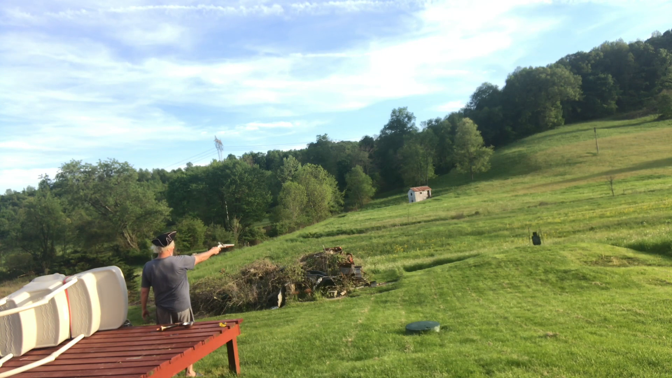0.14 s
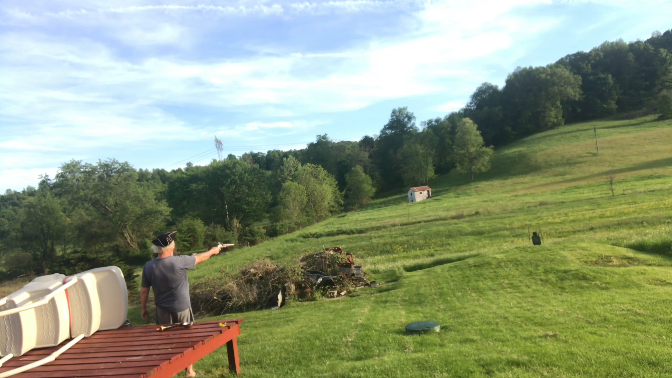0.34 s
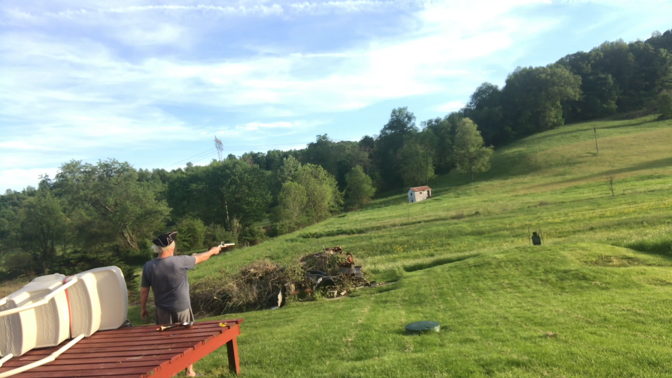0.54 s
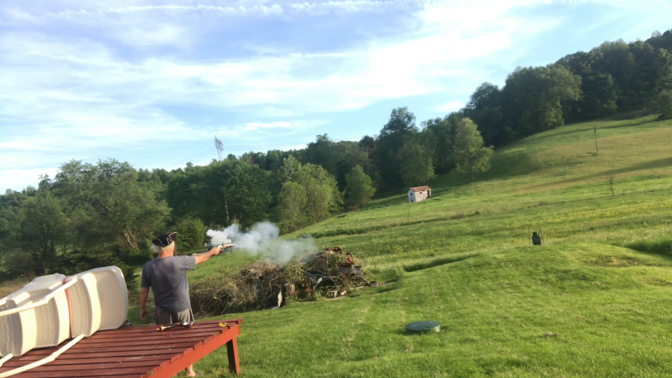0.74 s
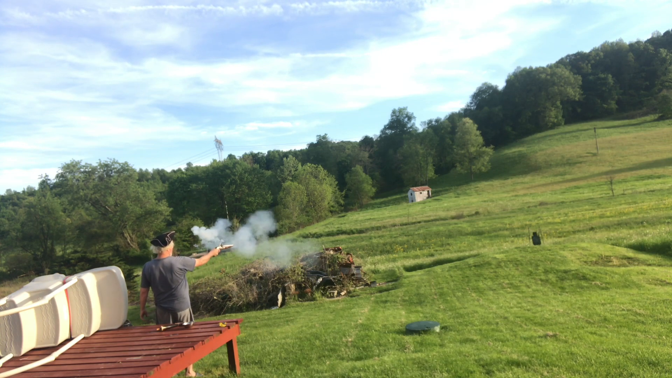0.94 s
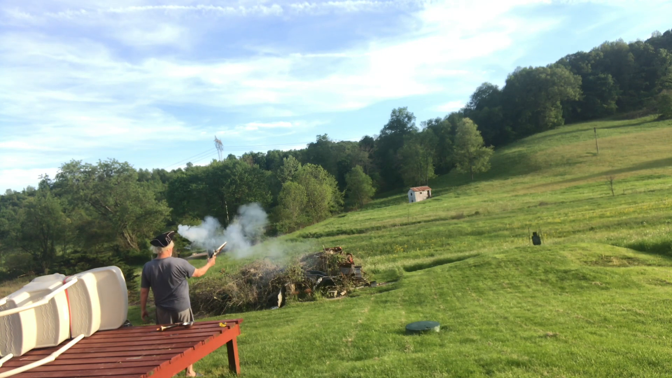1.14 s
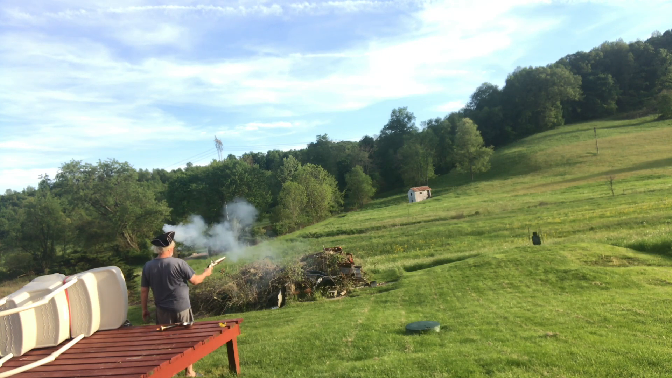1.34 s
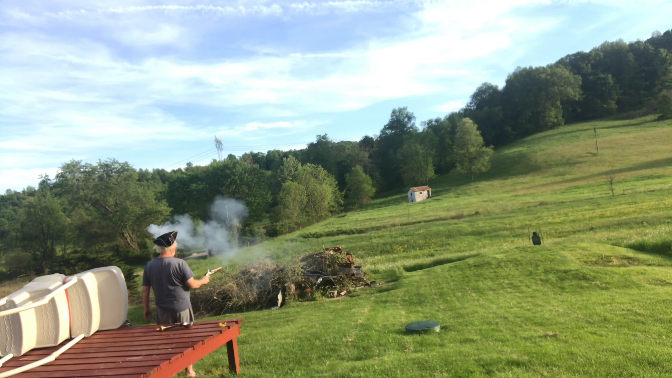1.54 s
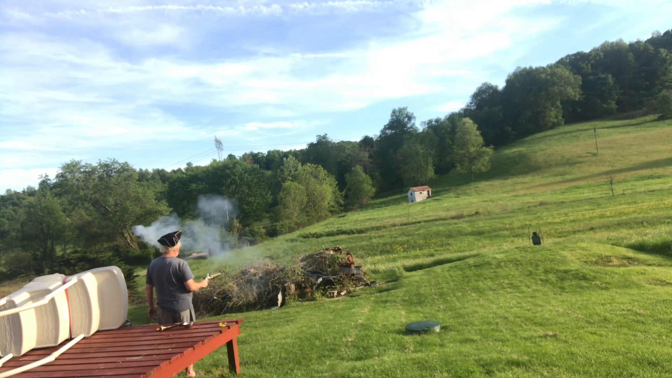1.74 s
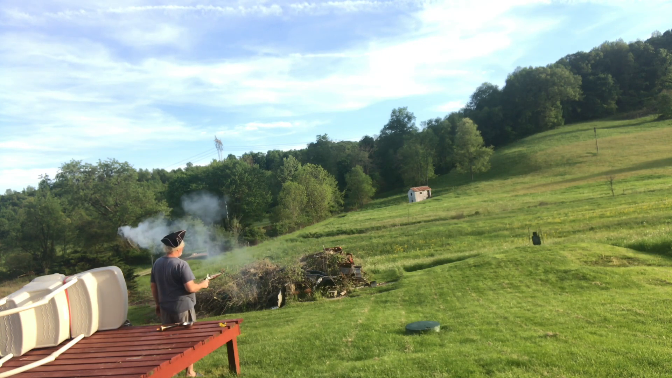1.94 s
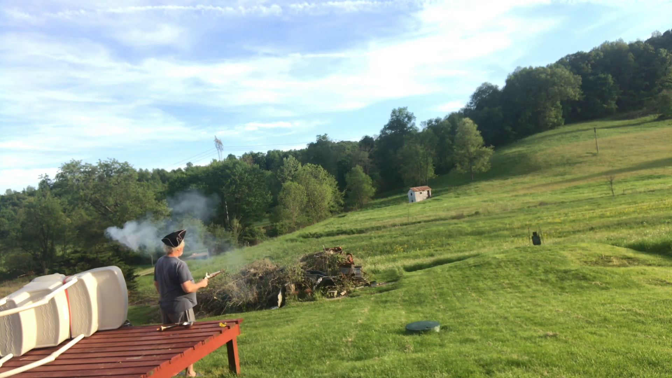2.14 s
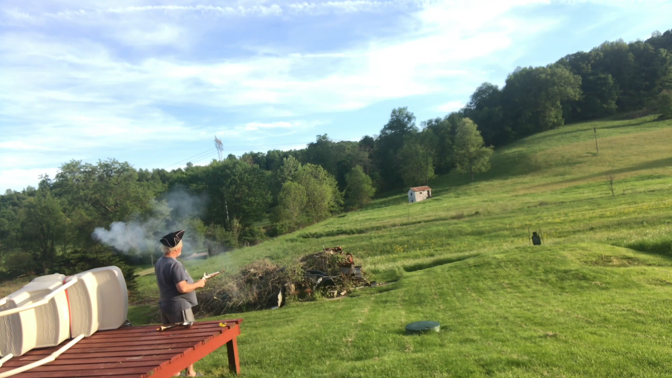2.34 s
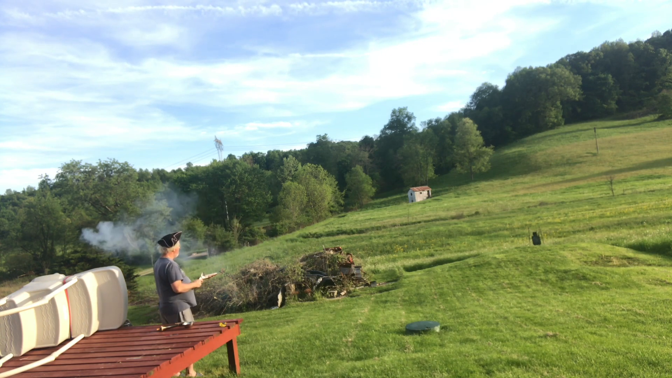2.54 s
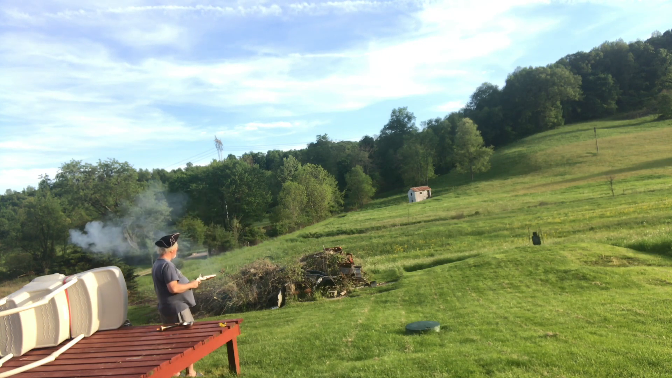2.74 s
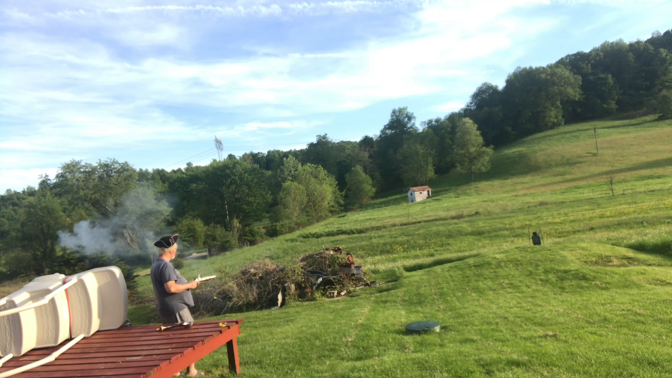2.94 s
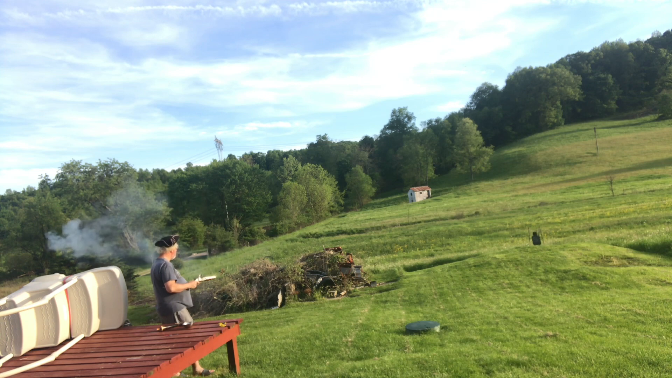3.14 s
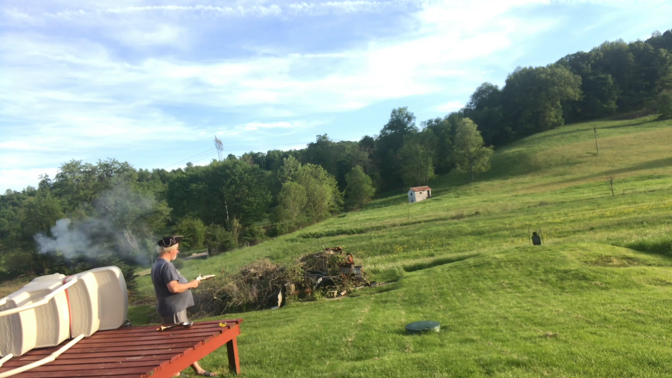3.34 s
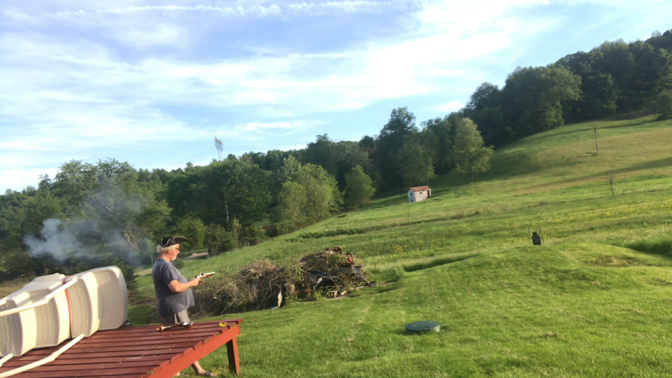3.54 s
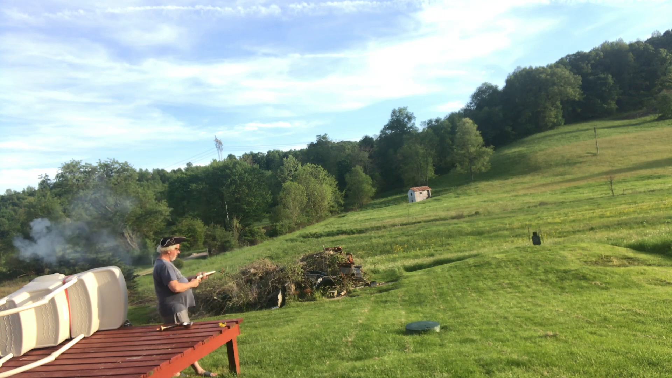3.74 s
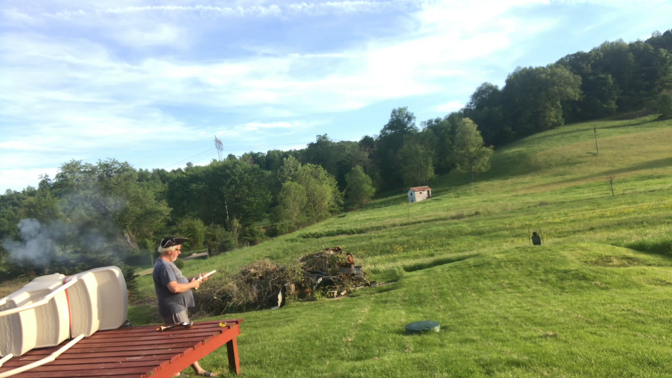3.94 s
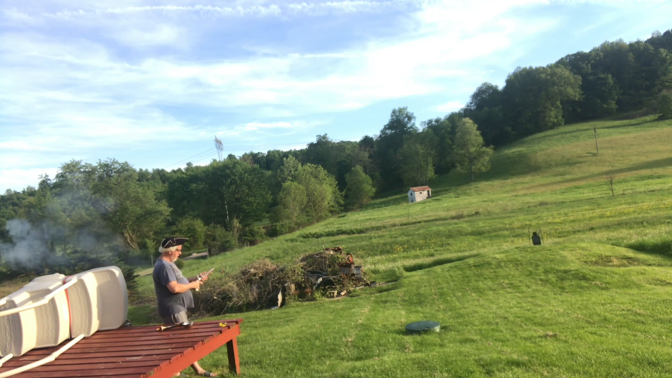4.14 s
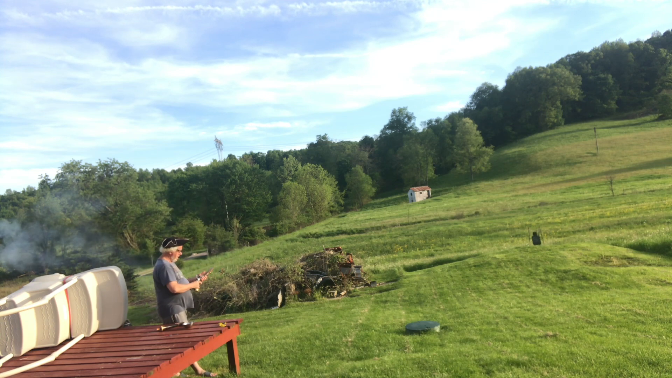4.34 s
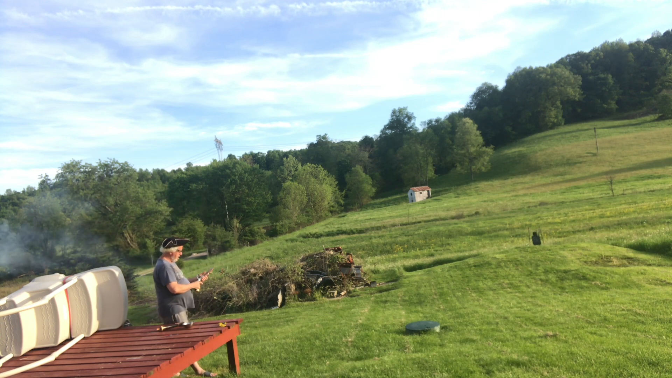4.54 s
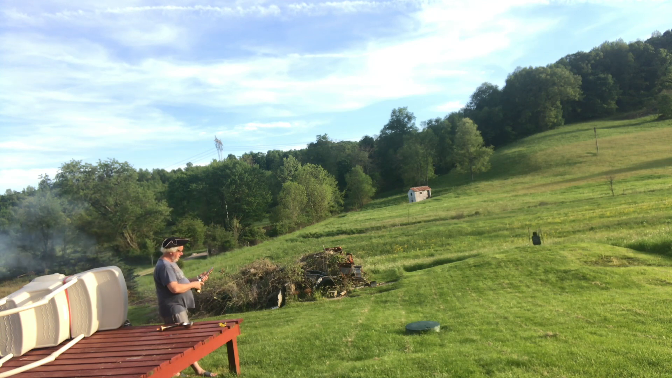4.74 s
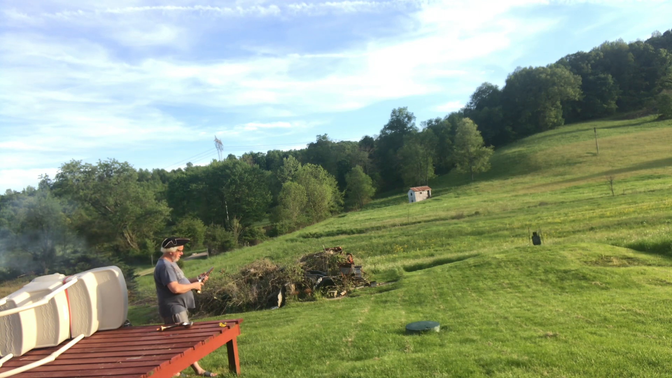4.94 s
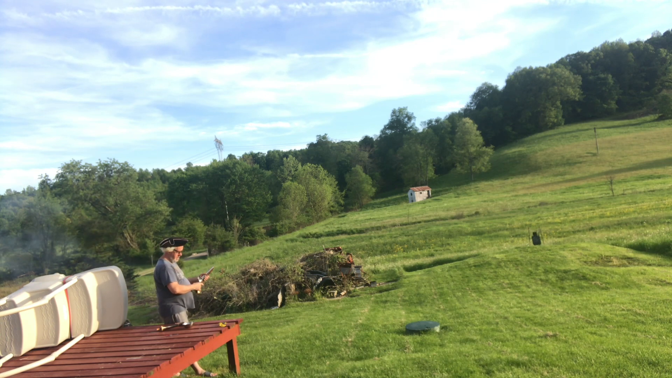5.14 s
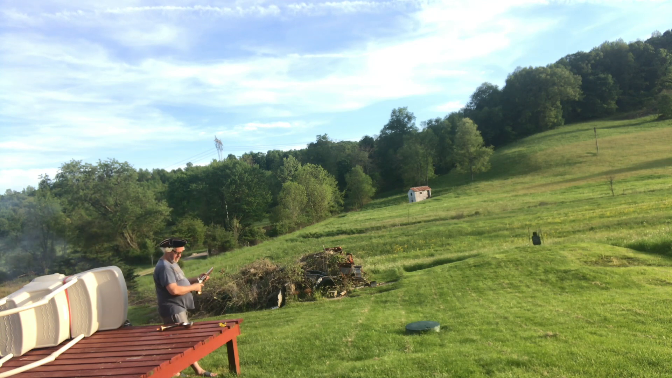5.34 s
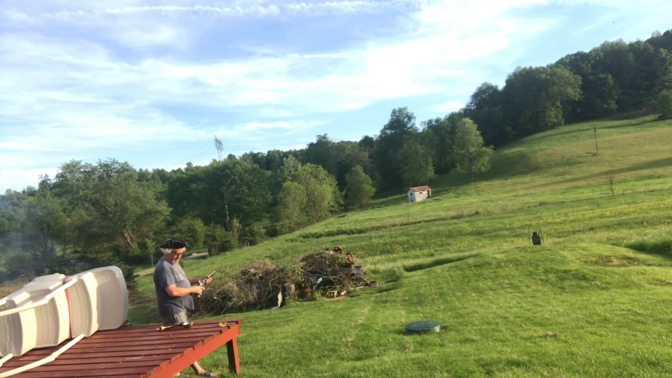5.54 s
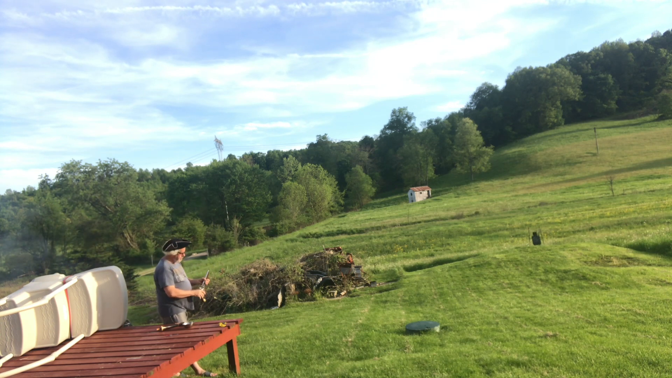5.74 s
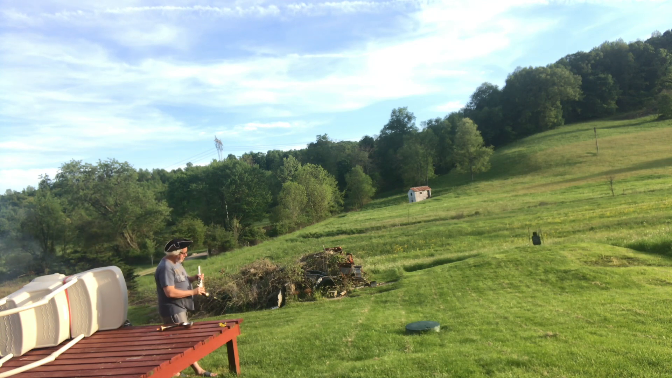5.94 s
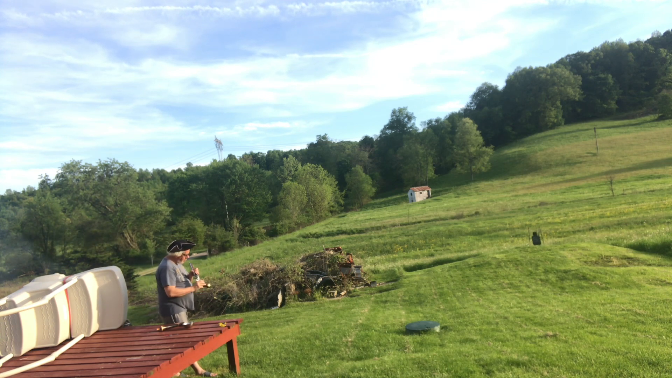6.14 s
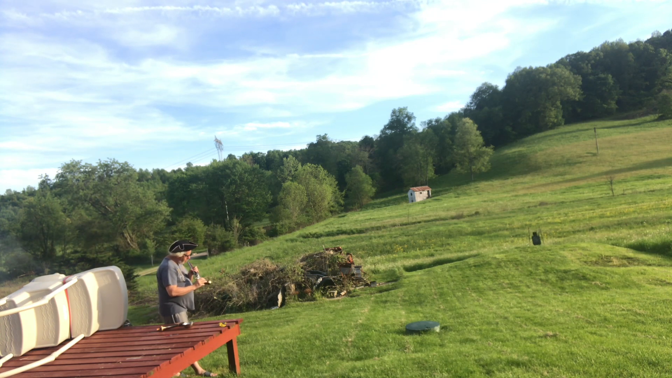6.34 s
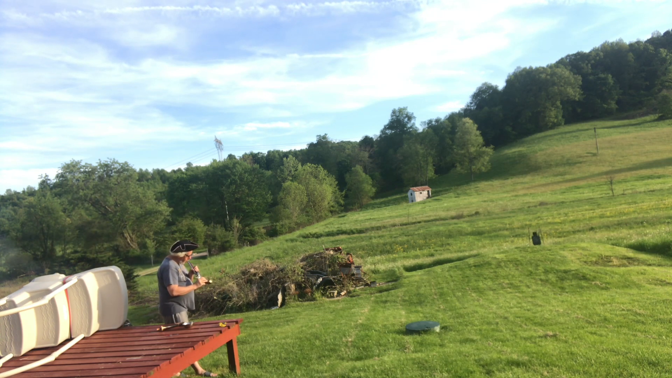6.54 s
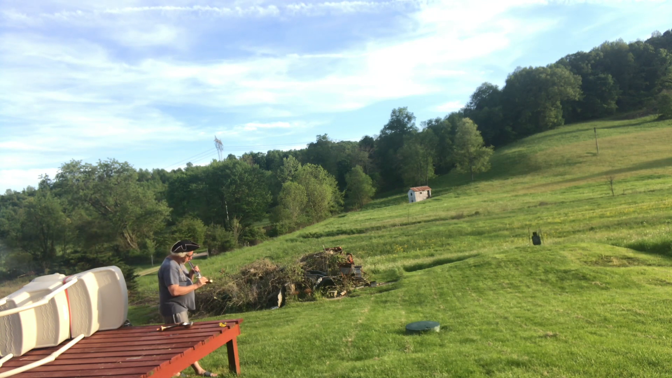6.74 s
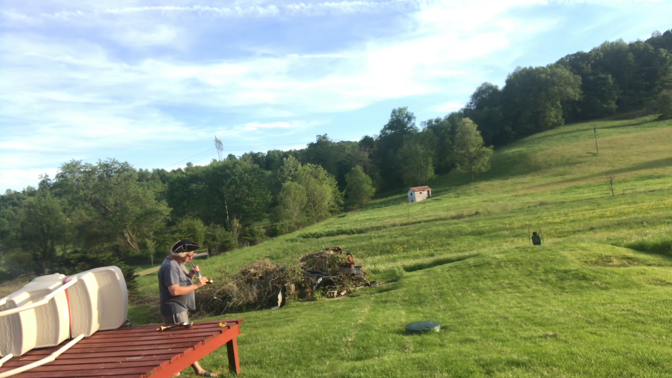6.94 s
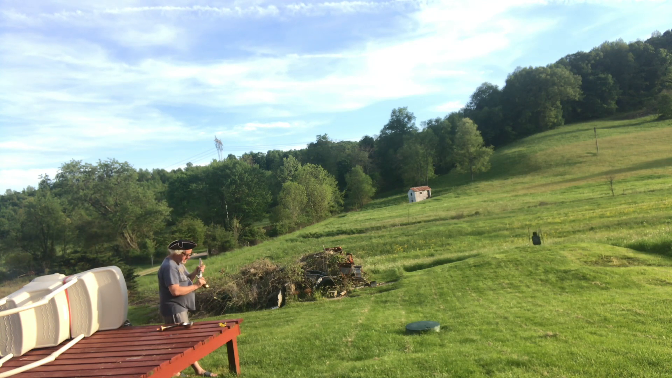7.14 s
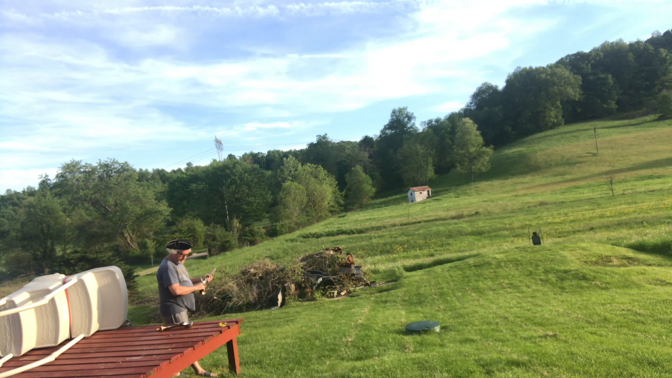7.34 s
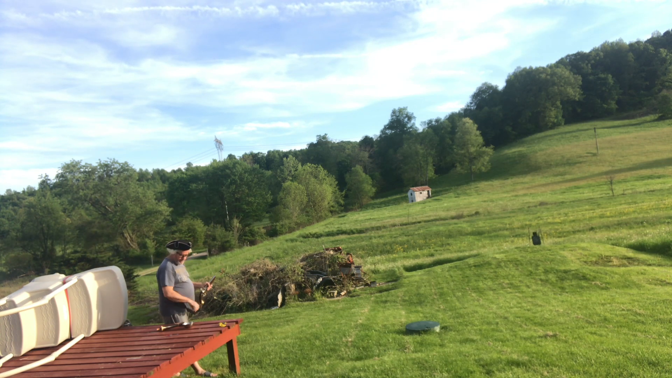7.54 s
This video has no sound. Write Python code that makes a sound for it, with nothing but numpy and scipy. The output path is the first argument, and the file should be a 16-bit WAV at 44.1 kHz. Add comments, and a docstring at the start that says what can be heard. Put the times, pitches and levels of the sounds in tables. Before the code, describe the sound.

Outdoors on a grassy hillside edged by woods, the microphone a few metres from a flintlock pistol. From 0 s there is low fluttering wind, a valley hush, a faint fading rush and thin bird whistles, with a tiny click near 0.27. At 0.58-0.60 the lock snaps in a tight cluster of bright steel clicks; fizz and two small pops lead to one huge, sharp, clipped bang at 0.70 with a brief deep thump. A hard slap returns at 0.75. From about 0.8 to 2.6 trees and banks scatter it back as a ragged wash with separate dull cracks, strongest near 1.26, steadily losing treble. A weak low roll and hollow distant swells linger until about 6. Small birds chirp, slur and buzz softly throughout, clearer after 2.5 and busiest around 5.3-7.5, with a few lower repeated notes after 6.5. Soft wind bumps come and go, calmer late.

```python
"""On a grassy slope a few metres from the microphone, a flintlock pistol is fired once.
The lock rings in damped modes, a fizz and two short pops lead to pressure fronts and a low thump.
Trees and hillside scatter it back with ever less treble; far ridges return only a low roll.
Small birds twitter as frequency-swept tones; filtered noise makes a light wind rumble on the microphone,
a valley hush and a far-off rushing that dies away."""
import sys
import numpy as np
from scipy import signal
from scipy.io import wavfile
from scipy.ndimage import uniform_filter1d

SR = 44100
rng = np.random.default_rng(int(sys.argv[2]) if len(sys.argv) > 2 else 0)


def persist_wave(psi):
    """Save psi, clipped to +-1, as 16-bit WAV."""
    counts = np.round(np.clip(psi, -1, 1) * 32767).astype(np.int16)
    wavfile.write(sys.argv[1], SR, np.atleast_2d(counts).T)


N = 334719
TIME = np.arange(N) / SR
SHOT_S = .704  # main front of the shot


def gain_of(db):
    """Logarithmic level: decibels to amplitude."""
    return 10 ** (np.asarray(db) / 20)


def evened(x):
    """Power normalisation: scales to rms 1."""
    return x / np.sqrt(np.mean(x ** 2) + 1e-20)


def read(points, hz):
    """Spectral interpolation: reads a spectrum table on a log-frequency axis."""
    f, value = np.transpose(points)
    return np.interp(np.log(hz + 1), np.log(f + 1), value)


def follow(curve):
    """Amplitude envelope: a dB curve as a gain for every sample."""
    return gain_of(np.interp(TIME, *np.transpose(curve)))


def swell(s, half_s):
    """Gaussian envelope: a smooth rise and fall round time s."""
    return np.exp(-.5 * ((TIME - s) / half_s) ** 2)


def add(mix, s, sound):
    """Superposition: mixes a sound in at time s."""
    part = mix[max(round(s * SR), 0):][:len(sound)]
    part += sound[:len(part)]


def impulse(points, size=4096):
    """Minimum phase: the causal click of energy 1 that has this spectrum."""
    hz = abs(np.fft.fftfreq(size, 1 / SR))
    log_gain = np.log(gain_of(read(points, hz)))
    # the Hilbert transform of the log gain gives the phase
    click = np.fft.ifft(np.exp(np.conj(signal.hilbert(log_gain)))).real[:size // 2]
    return click / np.linalg.norm(click)


def colour(x, points):
    """Linear filtering: shapes a signal by the spectrum of a table."""
    return signal.oaconvolve(x, impulse(points))[:len(x)]


def noise(points):
    """Random noise: a steady signal of rms 1 with this spectrum."""
    return evened(colour(rng.standard_normal(N), points))


def steadied(x, size):
    """Envelope normalisation: evens out swells slower than size samples."""
    return x / np.sqrt(abs(uniform_filter1d(x ** 2, size)) + 1e-12)


# shock fronts of the charge and their near reflections:
# (t/s, front peak level/dB, scattered roar level/dB, roar decay/s)
FRONTS = [(.7005, -24, -28, 0.0063), (.7025, -13, -10.5, 0.0069), (.7040, 1, -15.5, 0.013),
          (.7085, -5.5, -9.5, 0.016), (.7153, -9.5, -20.5, 0.0073), (.7225, -15, -28.5, 0.026)]
# the shot slapping back from things nearby: same columns
SLAPS = [(.7538, -4.5, -17, 0.019), (.7665, -32, -20.5, 0.0081), (.7705, -20, -16.5, 0.004),
         (.793, -19, -52.5, 0.022)]
# spectra of blast and slap: (f/Hz, relative level/dB)
BLAST_SPECTRUM = [(40, -10), (150, 0.5), (300, -10), (480, -12.5), (850, -11), (1100, -9.5), (1500, -8),
                  (2000, -14.5), (2300, -17), (2800, -12.5), (3900, -15), (5500, -19.5), (9000, -26.5),
                  (15500, -30)]
SLAP_SPECTRUM = [(50, -15.5), (120, -5), (250, -6), (420, -19.5), (630, -27), (870, -10), (1650, -3.5),
                 (2700, -13), (3600, -7), (4300, -14), (6800, -19), (10400, -30), (15500, -30.5)]


def shocks(rows, spectrum, push_s):
    """Blast wave: each front is a pressure jump with a suction phase, trailed by dense scattered noise."""
    fronts, power = np.zeros(N), np.zeros(N)
    t = np.arange(SR // 4) / SR
    front = colour((1 - t / push_s) * np.exp(-t / push_s), spectrum)
    for s, front_db, roar_db, decay_s in rows:
        add(fronts, s, gain_of(front_db) * front / abs(front).max())
        add(power, s, (gain_of(roar_db) * np.exp(-t / decay_s)) ** 2)
    roar = np.sqrt(power) * steadied(noise(spectrum), size=200)
    return fronts + roar


# the low push of the expanding gas: (t/s, f/Hz, level/dB, swell/s)
THUMPS = [(0.7053, 121.1, -16.5, .006), (.712, 37.85, -25.5, .012)]


def boom():
    """Gas expansion: a low thump and a slower, deeper heave, each a sine that swells and dies."""
    out, t = np.zeros(N), np.arange(SR // 4) / SR
    for s, hz, db, swell_s in THUMPS:
        envelope = t / swell_s * np.exp(1 - t / swell_s)
        add(out, s, -gain_of(db) * envelope * np.sin(2 * np.pi * hz * t))
    return out


def shudder(db=-24, decay_s=.045, rise_s=0.0027):
    """Exponential decay: bass noise lingers just after the blast."""
    age = np.maximum(TIME - SHOT_S, 0)
    spectrum = [(15, -6.0), (35, -6), (90, -3), (200, -1.0), (330, -7), (600, -20.5), (3000, -64)]
    bass = steadied(noise(spectrum), size=1200)
    return gain_of(db) * bass * np.exp(-age / decay_s) * (1 - np.exp(-age / rise_s))


# two short pops just before the loudest front: (t/s, level/dB, f/Hz, decay/s)
EARLY_POPS = [(0.6805, -21, 1349, .0014), (.6924, -22, 851, .005)]


def fizz_and_pops(snap=0.87, snap_s=0.00064, fizz_db=-37, catch_s=0.026):
    """Noise and damped resonance: a fizz peaks at the shot; two pops have a snap and a brief hollow ring."""
    burning = np.exp(-abs(TIME - SHOT_S) / catch_s)
    fizz = noise([(200, -13), (700, 0.0), (2500, -15), (5000, -19.0), (9000, -21.5), (15000, -30)])
    out = gain_of(fizz_db) * burning * fizz
    t = np.arange(SR // 20) / SR
    for s, db, hz, decay_s in EARLY_POPS:
        spit = rng.standard_normal(len(t))
        spit = colour(spit, [(300, -6.5), (1500, 3.5), (4500, 5), (7000, -9.5), (15000, -17)])
        ring = np.exp(-t / decay_s) * np.sin(2 * np.pi * hz * t)
        add(out, s, gain_of(db) * (ring + snap * spit * np.exp(-t / snap_s)))
    return out


# clicks of the lock: (t/s, level/dB, relative share of bright steel scrape)
LOCK_CLICKS = [(0.269, -44.5, 1.3), (0.5804, -28.5, 0.28), (0.5894, -22.5, 1), (0.5904, -47, .15),
               (0.5952, -22.5, 1.35), (0.598, -25, 0.33), (.639, -37.5, .2), (1.003, -47, 2.8)]
# what the lock rings with: (f/Hz, relative level/dB, 60 dB decay/s)
LOCK_MODES = [(1175, -22, .015), (1760, -9.5, 0.022), (2100, -21.5, 0.014), (2300, -9.5, .025),
              (2490, -4, .025), (3300, -3.5, 0.015), (3620, -9, .012), (5350, -12, 0.022),
              (6680, -11.5, 0.019)]


def lock(scrape_s=0.00069, rattle=0.14, rattle_s=0.007):
    """Modal vibration: sear, flint and frizzen click with a steel scrape and a short damped ring."""
    out, t = np.zeros(N), np.arange(SR // 10) / SR
    ring = np.zeros(len(t))
    for hz, db, t60 in LOCK_MODES:
        ring += gain_of(db - 60 * t / t60) * np.sin(2 * np.pi * hz * t)
    for s, db, bright in LOCK_CLICKS:
        decay = np.exp(-t / scrape_s) + rattle * np.exp(-t / rattle_s)
        scrape = rng.standard_normal(len(t)) * decay
        add(out, s, gain_of(db) * (0.35 * ring + 0.58 * bright * scrape))
    return colour(out, [(300, -13.5), (1200, 3.0), (7000, 0.0), (10500, -3.5), (14500, -3.5)])


# single echoes from the edge of the wood: (t/s, peak level/dB)
ECHOES = [(1.062, -38.5), (1.126, -31.5), (1.139, -34), (1.177, -52), (1.195, -32.5), (1.256, -24),
          (1.295, -26), (1.332, -32), (1.425, -32), (1.463, -30.5), (1.557, -30.5), (1.571, -29),
          (1.624, -32.5), (1.685, -30), (1.844, -37), (2.051, -36), (2.16, -37), (2.502, -40),
          (2.612, -43.5)]
# spectrum of one echo: (f/Hz, relative level/dB)
ECHO_SPECTRUM = [(150, -16), (450, 5), (1000, 9.5), (1700, 6), (2600, -5.5), (5000, -29.5), (9000, -55),
                 (15000, -54)]


def echoes(smear=0.17, smear_s=0.0054, lead_s=0.0017):
    """Discrete reflection: prominent trees and banks each return a dull crack, smeared by branches."""
    out, t = np.zeros(N), np.arange(-SR // 100, SR // 25) / SR
    # branches before and behind the main reflection
    branches = np.exp(-abs(t) / np.where(t < 0, lead_s, smear_s))
    for s, peak_db in ECHOES:
        reflection = (t == 0) + smear * rng.standard_normal(len(t)) * branches
        crack = colour(reflection, ECHO_SPECTRUM)
        add(out, s + t[0], gain_of(peak_db) * crack / abs(crack).max())
    return out


# stands of trees that scatter the shot back, nearest first:
# (arrival t/s, level/dB, rise/s, hold/s, fade/(dB per s))
STANDS = [(0.758, -51, .02, 0.032, 70), (0.867, -49.5, 0.039, 0.039, 66), (1.023, -48, 0.1, 0.11, 24),
          (1.414, -46.5, .04, 0.071, 65), (1.622, -52, .03, .05, 40), (1.808, -48.5, 0.066, 0.024, 39),
          (1.968, -51.5, 0.045, 0.35, 18), (2.75, -60.5, 0.072, .15, 67)]


def stands():
    """Power addition: each stand answers at its edge, holds while the sound crosses it, then fades."""
    power = np.zeros(N)
    for s, db, rise_s, hold_s, fade_db in STANDS:
        past_s = np.maximum(TIME - s - rise_s - hold_s, 0)
        rise = np.clip((TIME - s) / rise_s, 0, 1)
        power += (rise * gain_of(db - fade_db * past_s)) ** 2
    return np.sqrt(power)


# spectrum of the hillside before absorption by the air: (f/Hz, relative level/dB)
HILL_SPECTRUM = [(120, -25), (350, -11), (650, -11.5), (1000, -3), (1700, -2), (2400, -4), (3600, -1),
                 (6500, -0.5), (10000, -9.5), (15500, -7)]


def hillside(absorb_db=5.0, absorb_power=1.16, spread_db=-0.5, clump_db=1.0, trunks_per_s=2500):
    """Multiple scattering: thousands of tiny tree echoes; the air takes more treble on longer paths."""
    signs = rng.choice([-1., 1.], N)
    present = rng.random(N) < trunks_per_s / SR
    taps = signs * present * gain_of(spread_db * np.minimum(rng.exponential(1, N), 4))
    clumps = evened(uniform_filter1d(rng.standard_normal(N), size=300))
    # clumping weakens with delay beyond one second
    clump_gain = gain_of(clump_db * clumps / np.maximum(TIME - SHOT_S, 1))
    taps = steadied(taps * clump_gain, size=2500)
    hz, t, z = signal.stft(taps, SR, nperseg=256)
    path_s = np.maximum(t - SHOT_S, 0)
    absorbed = absorb_db * path_s * (hz[:, None] / 1000) ** absorb_power
    shape = gain_of(read(HILL_SPECTRUM, hz)[:, None] - absorbed)
    # the middle band keeps its power, so the stands alone set the level there
    middle = (hz > 600) & (hz < 2500)
    shape /= np.sqrt((shape[middle] ** 2).sum(0) / len(hz))
    return signal.istft(z * shape, SR)[1][:N] * stands()


def crackle(db=6.0, per_s=45, spread_db=2.5):
    """Sparse scattering: single trunks stand out of each stand's scatter as small dull cracks."""
    present = rng.random(N) < per_s / SR
    sizes = gain_of(spread_db * np.minimum(rng.exponential(1, N), 3)) * present
    cracks = colour(sizes * stands(), ECHO_SPECTRUM)
    return gain_of(db) * cracks / abs(impulse(ECHO_SPECTRUM)).max()


# broad returns from the far ridges: (t/s, half length/s, level/dB before the roll's overall gain)
RIDGES = [(1.0, 0.085, -62), (1.578, 0.11, -62), (2.156, 0.29, -53.5), (2.6, 0.33, -56), (4.4, 0.76, -62),
          (5.848, 0.18, -66)]
# spectrum of these returns: (f/Hz, relative level/dB)
ROLL_SPECTRUM = [(60, -11.5), (130, -0.5), (230, -3), (400, 0), (700, -6.5), (1200, -23), (3000, -52.5)]
# the last, hollow swells from the farthest ridges: (t/s, half length/s, f/Hz, bandwidth/Hz, level/dB)
SWELLS = [(3.81, 0.75, 920, 329.4, -63), (4.35, 0.36, 976, 258.6, -66), (5.093, 0.19, 914, 292.4, -64.5),
          (4.703, 0.66, 302.4, 131.6, -64.5), (5.454, 0.19, 215, 89.4, -58), (5.55, 0.22, 683, 150.8, -65),
          (5.801, 0.2, 130.5, 70.6, -62)]


def roll(db=-1.0):
    """Low-pass reflection: far ridges return the low part of the shot, and a few hollow band-passed swells."""
    power = sum((gain_of(ridge_db) * swell(s, half_s)) ** 2 for s, half_s, ridge_db in RIDGES)
    out = gain_of(db) * noise(ROLL_SPECTRUM) * np.sqrt(power)
    for s, half_s, hz, width, swell_db in SWELLS:
        edges = [hz - width / 2, hz + width / 2]
        band = signal.butter(2, edges, "band", fs=SR, output="sos")
        hollow = evened(signal.sosfilt(band, rng.standard_normal(N)))
        out += gain_of(swell_db) * hollow * swell(s, half_s)
    return out


def syllable(length, pitches, buzz, buzz_depth=.1, buzz_hz=170):
    """Frequency modulation: a whistled glide through three pitches; buzz is a fast flutter of its pitch."""
    u = np.linspace(0, 1, max(int(length * SR), 64))
    hz = np.polyval(np.polyfit([0, .5, 1], pitches, 2), u)
    jitter = evened(uniform_filter1d(rng.standard_normal(SR // 2), size=60))[:len(u)]
    flutter = np.sin(2 * np.pi * buzz_hz * length * u) + jitter
    turns = np.cumsum(hz * (1 + buzz_depth * buzz * flutter)) / SR
    return np.sqrt(2 * abs(np.sin(np.pi * u))) * np.sin(2 * np.pi * turns)


# pitch at start, middle and end of each kind of note, as multiples of its own pitch
CHIRP_SHAPE = [.89, 1, .86]
SLUR_SHAPE = [1, .86, .74]
RISE_SHAPE = [.87, 1, 1.12]
PEAK_SHAPE = [.74, 1, .81]
BUZZ_SHAPE = [1.02, 1, .98]
# a whistle settles from just above its pitch
WHISTLE_SHAPE = [1.008, 1, 1.002]
# note levels below are before the birds' overall gain
# arched chirps in two voices at once: (t/s, length/s, upper f/Hz, upper level/dB, lower level/dB)
CHIRPS = [(2.607, .037, 3180, -67, -66), (2.808, .037, 4110, -69, -73), (2.86, 0.037, 4150, -70.5, -83),
          (3.126, 0.044, 3980, -62.5, -59.5), (4.374, 0.048, 3380, -59, -64),
          (5.604, 0.049, 3460, -59.5, -64), (6.291, 0.065, 3310, -63.5, -82),
          (7.272, 0.054, 3050, -58, -66)]
LOWER_VOICE = .84  # pitch of the second voice against the first
# falling slurs: (t/s, length/s, start f/Hz, level/dB)
SLURS = [(2.515, .085, 4750, -71), (2.655, .075, 4400, -68.5), (3.275, .035, 4650, -70),
         (3.383, .04, 3600, -71), (3.638, .02, 6200, -65.5), (3.801, .015, 3150, -72),
         (4.0, .06, 4200, -73), (4.433, .045, 4800, -75), (4.557, .05, 4150, -76), (5.2, .04, 4500, -69),
         (6.091, .06, 7300, -64.5), (6.19, .075, 6450, -60), (6.234, .06, 7450, -66.5),
         (6.385, .07, 6700, -68.5), (6.5, .055, 4450, -68), (6.525, .04, 2250, -68),
         (6.635, .045, 2350, -66), (6.745, .045, 2300, -66), (6.815, .045, 4450, -70),
         (6.87, .045, 2300, -66), (7.135, .05, 2280, -66), (7.29, .045, 2200, -66)]
# rising notes: (t/s, length/s, middle f/Hz, level/dB)
RISES = [(.274, .016, 4500, -56.5), (1.895, 0.031, 4170, -61.5), (2.37, 0.025, 4000, -72),
         (2.445, 0.049, 4620, -75), (2.935, 0.062, 4380, -71.5), (6.276, 0.053, 3850, -66.5),
         (6.55, 0.093, 4450, -70)]
# held whistles: (t/s, length/s, f/Hz, level/dB)
WHISTLES = [(.06, 0.15, 2910, -71.5), (.179, 0.049, 2100, -63.5), (.326, .155, 6090, -55.5),
            (.45, 0.091, 6030, -67.5), (.46, .12, 5350, -69), (.465, 0.13, 2120, -64.5),
            (3.97, 0.082, 4860, -77), (3.826, .032, 2070, -71), (4.345, 0.063, 2235, -67),
            (4.442, 0.068, 2700, -73.5), (5.013, 0.045, 5300, -78), (5.782, 0.1, 4830, -72),
            (6.14, 0.12, 6450, -73), (6.183, .11, 2150, -75), (6.24, 0.12, 5050, -61),
            (6.316, 0.1, 3260, -73), (7.19, 0.087, 2143, -69.5), (7.28, .18, 3305, -72.5),
            (7.469, 0.036, 3285, -66.5)]
# buzzy notes: (t/s, length/s, f/Hz, level/dB, buzz 0-1)
BUZZES = [(3.028, 0.034, 4200, -65.5, .6), (3.069, .05, 4200, -72, 0.33), (4.125, 0.069, 3826, -70, .2),
          (4.331, 0.014, 2830, -60.5, 0.5), (5.58, 0.0343, 4140, -60, 1), (5.781, 0.033, 2750, -68, 0.5),
          (5.966, .11, 6050, -71.5, 0.2), (6.225, 0.054, 5680, -65.5, 0.7)]
# a quick trill of like notes
TRILL_S, TRILL_STEP_S, TRILL_NOTE_S, TRILL_HZ, TRILL_DB = 0.0031, .0187, 0.0125, 2765, -61.5
# one figure of the warble: (delay/s, length/s, f/Hz, level/dB against the warble, shape)
FIGURE = [(0, .048, 4270, -2, RISE_SHAPE), (.042, .029, 6850, 2, PEAK_SHAPE),
          (.088, .038, 4400, 0, SLUR_SHAPE)]
# the figure repeats, each time louder by the growth
WARBLE_S, WARBLE_STEP_S, WARBLE_DB, WARBLE_GROWTH_DB = 5.346, .185, -75.5, 2.5


def notes(chirp_buzz=0.14, glide_buzz=.15, whistle_buzz=.03):
    """Tone sequence: every near bird note as (t/s, length/s, f/Hz, level/dB, shape, buzz)."""
    for s, length, hz, upper_db, lower_db in CHIRPS:
        yield s, length, hz, upper_db, CHIRP_SHAPE, chirp_buzz
        yield s, length, hz * LOWER_VOICE, lower_db, CHIRP_SHAPE, chirp_buzz
    kinds = [(SLURS, SLUR_SHAPE, glide_buzz), (RISES, RISE_SHAPE, glide_buzz),
             (WHISTLES, WHISTLE_SHAPE, whistle_buzz)]
    for rows, shape, buzz in kinds:
        for s, length, hz, db in rows:
            yield s, length, hz, db, shape, buzz
    for s, length, hz, db, buzz in BUZZES:
        yield s, length, hz, db, BUZZ_SHAPE, buzz
    for k in range(6):
        yield TRILL_S + k * TRILL_STEP_S, TRILL_NOTE_S, TRILL_HZ, TRILL_DB, CHIRP_SHAPE, chirp_buzz
    for k in range(4):
        start_s = WARBLE_S + k * WARBLE_STEP_S
        warble_db = WARBLE_DB + k * WARBLE_GROWTH_DB
        for delay, length, hz, db, shape in FIGURE:
            yield start_s + delay, length, hz, warble_db + db, shape, chirp_buzz


def birds(db=1.5, wet_db=-10, ring_s=0.083, far_db=-81):
    """Reverberation: near birds, a faint twitter of farther ones, and their soft return from the trees."""
    near, far = np.zeros(N), np.zeros(N)
    for s, length, hz, level_db, shape, buzz in notes():
        add(near, s, gain_of(db + level_db) * syllable(length, hz * np.array(shape), buzz))
    for when, span, height, arch, fall, loud in rng.random(size=(110, 6)):
        pitches = 2500 * 2 ** height * np.array([1, .85 + .2 * arch, .72 + .34 * fall])
        note = syllable(.03 + .05 * span, pitches, .2)
        add(far, when * N / SR, gain_of(far_db + 7 * loud) * note)
    t = np.arange(SR // 2) / SR
    trees = rng.standard_normal(len(t)) * np.exp(-t / ring_s)
    trees /= np.linalg.norm(trees)
    # far birds arrive as much through the trees as directly
    returned = signal.oaconvolve(gain_of(wet_db) * near + far, trees)[:N]
    return near + far + returned


# strength of the breeze before its eddies: (t/s, level/dB)
BREEZE = [(0, -59), (1.0, -56.5), (1.6, -53), (2.7, -53), (3.2, -57.5), (3.65, -53), (4.2, -62.5),
          (5.2, -63), (5.8, -60), (6.8, -66), (7.15, -60.5), (7.59, -64)]
# gusts that strike the microphone: (t/s, level/dB)
GUSTS = [(.058, -44.5), (.286, -51), (.39, -46.5), (0.521, -43), (1.1, -50.5), (1.23, -44), (1.47, -46),
         (1.61, -45), (1.94, -47), (2.245, -41), (2.36, -47), (2.51, -42), (3.07, -42), (3.53, -49),
         (4.681, -46.5), (4.93, -50.5), (7.05, -52.5), (7.38, -50.5)]
# spectra of the wind and of the valley's hush: (f/Hz, relative level/dB)
WIND_SPECTRUM = [(15, -14.5), (35, -5.5), (65, 2.5), (110, -5.5), (180, -18), (350, -27.5), (1000, -58.5),
                 (4000, -88)]
AIR_SPECTRUM = [(59, -33.5), (100, -2), (173, -5.5), (301, -8), (511, -13.5), (659, -10.5), (814, -11),
                (1030, -11.5), (1820, -20.5), (3030, -22.5), (4930, -27.5), (6770, -28.5), (10300, -36),
                (14800, -34), (15800, -41)]


def wind(air_db=-61.5, eddy_db=3.0, gust_s=0.015):
    """Turbulence: an eddying breeze and brief gusts buffet the microphone over the valley's steady hush."""
    eddies = uniform_filter1d(rng.standard_normal(N), size=2000)
    eddies = evened(uniform_filter1d(eddies, size=1000))
    power = (follow(BREEZE) * gain_of(eddy_db * eddies)) ** 2
    for s, gust_db in GUSTS:
        power += (gain_of(gust_db) * swell(s, gust_s)) ** 2  # gust_s is a half length
    rumble = steadied(noise(WIND_SPECTRUM), size=2000) * np.sqrt(power)
    return rumble + gain_of(air_db) * noise(AIR_SPECTRUM)


# spectrum of the distant rushing: (f/Hz, relative level/dB)
RUSH_SPECTRUM = [(150, -26), (450, -5), (850, 1), (1400, -3), (2200, -17.5), (5000, -40.5)]


def rush(db=-60.5, half_s=0.66):
    """Filtered noise: a soft far-off rushing, fading from the start."""
    return gain_of(db) * noise(RUSH_SPECTRUM) * swell(0, half_s)


def scene():
    """Superposition: the shot and its lock, then the landscape's answer among birds and wind."""
    charge = shocks(FRONTS, BLAST_SPECTRUM, push_s=0.00025) + boom() + shudder()
    slaps = shocks(SLAPS, SLAP_SPECTRUM, push_s=0.000083)
    shot = charge + slaps + fizz_and_pops() + lock()
    # the scattered return fades in with the nearest trees and out with the farthest
    returning = np.interp(TIME, [.74, .8, 6.4, 7.2], [0, 1, 1, 0])
    landscape = returning * (hillside() + crackle() + roll()) + echoes()
    return (shot + landscape + birds() + wind() + rush())[None]


def record(dry, edge_hz=15850):
    """Clipping and band limiting: peaks beyond full scale are cut off, then the top treble is removed."""
    low_pass = signal.firwin(511, edge_hz, window=("kaiser", 9), fs=SR)
    return signal.oaconvolve(np.clip(dry, -1, 1), low_pass[None], "same")


dry = scene()
out = record(dry)
persist_wave(out)
```